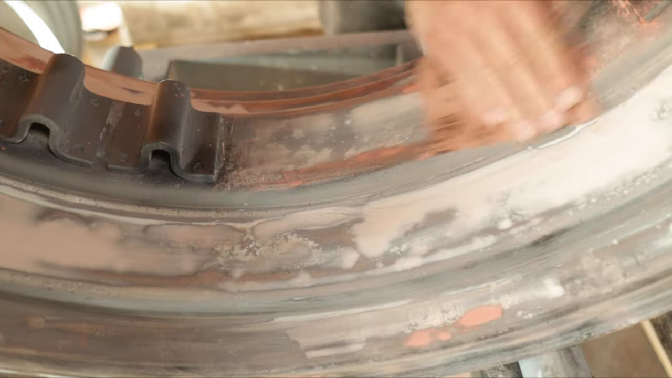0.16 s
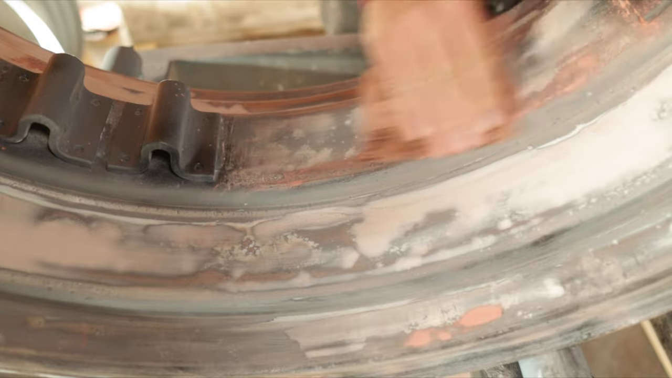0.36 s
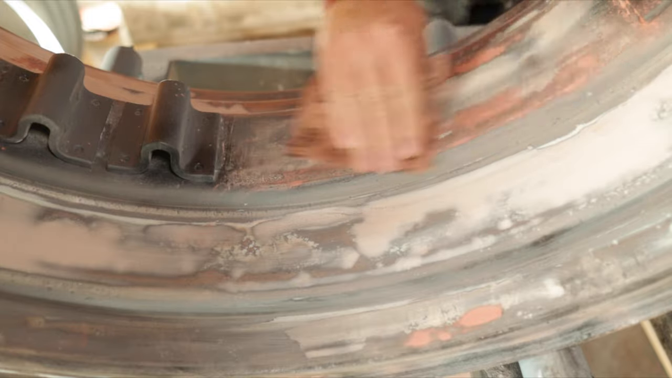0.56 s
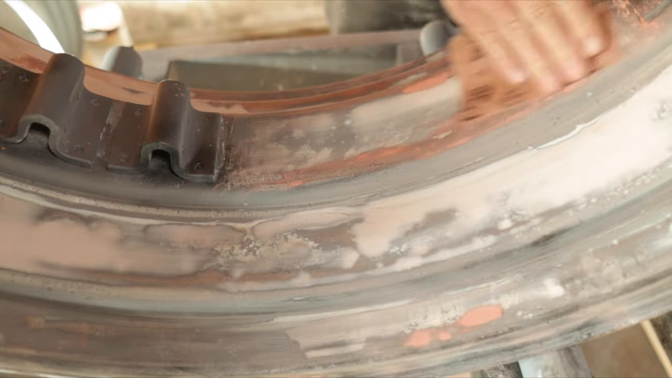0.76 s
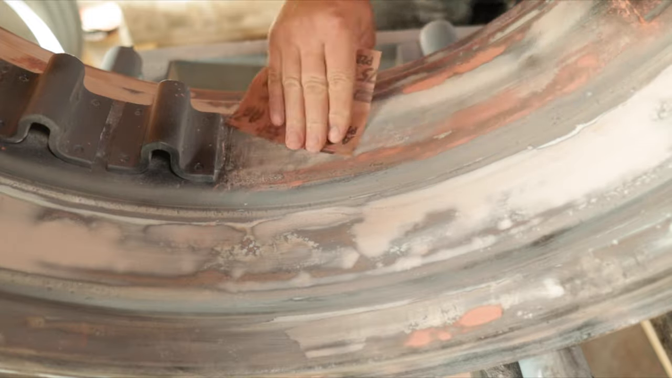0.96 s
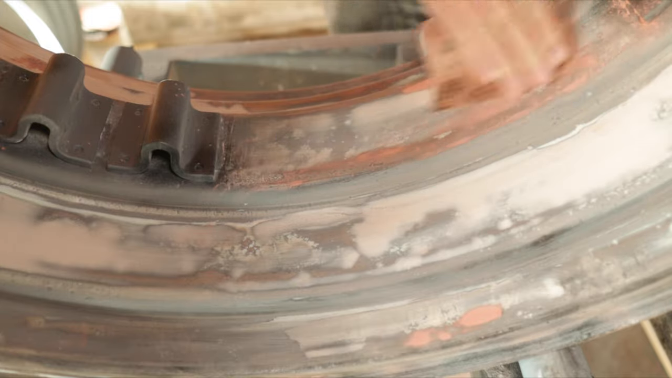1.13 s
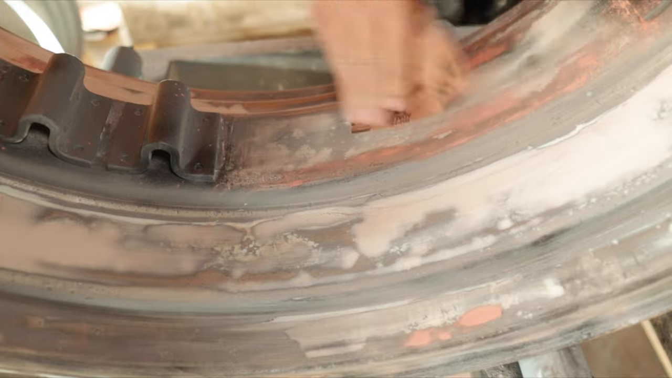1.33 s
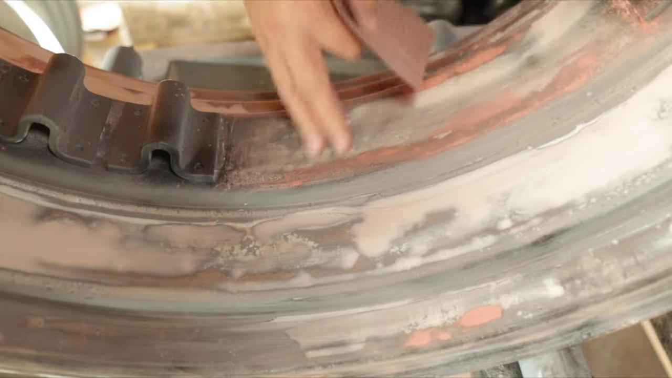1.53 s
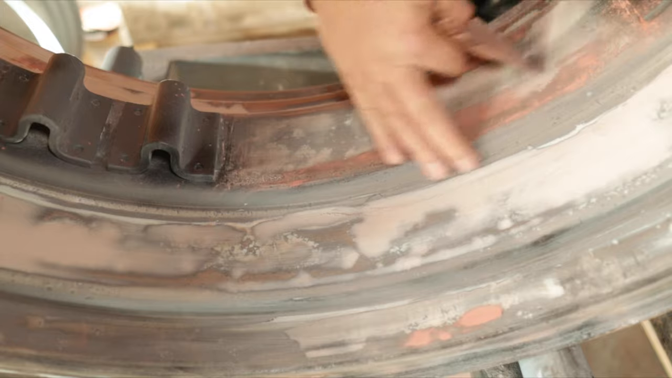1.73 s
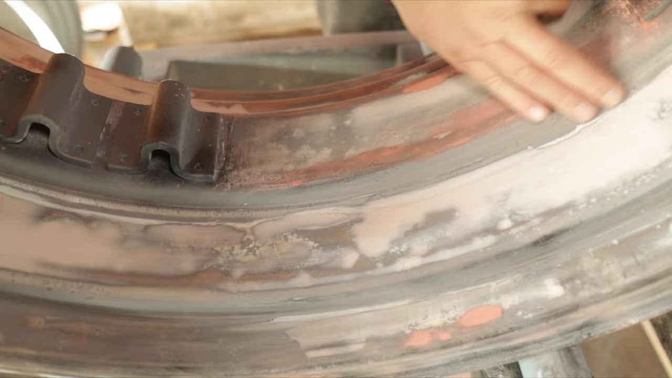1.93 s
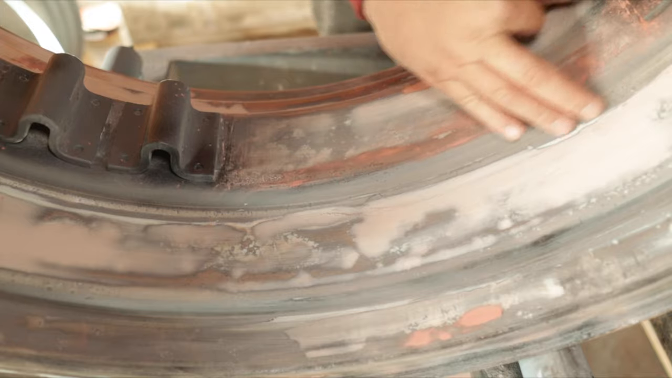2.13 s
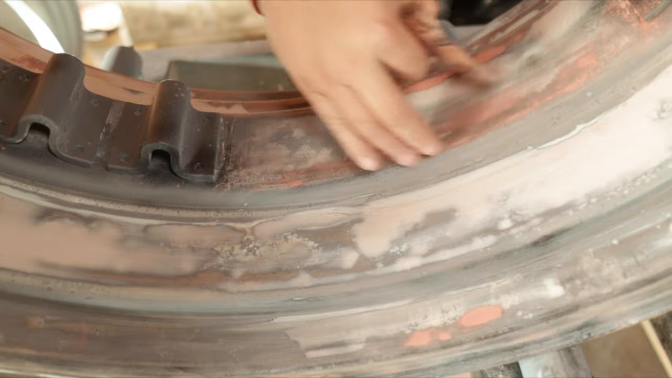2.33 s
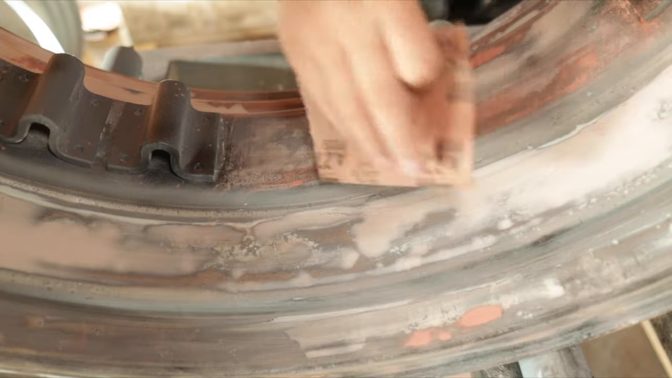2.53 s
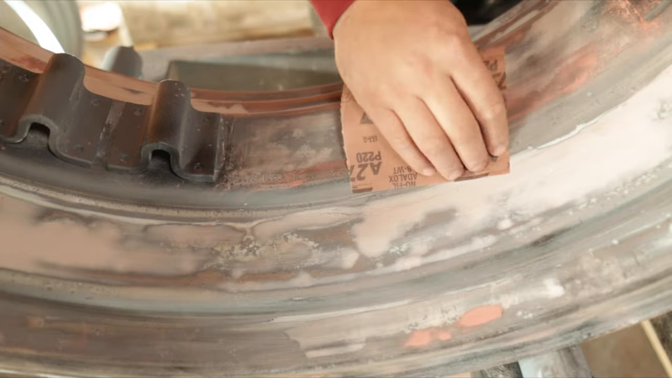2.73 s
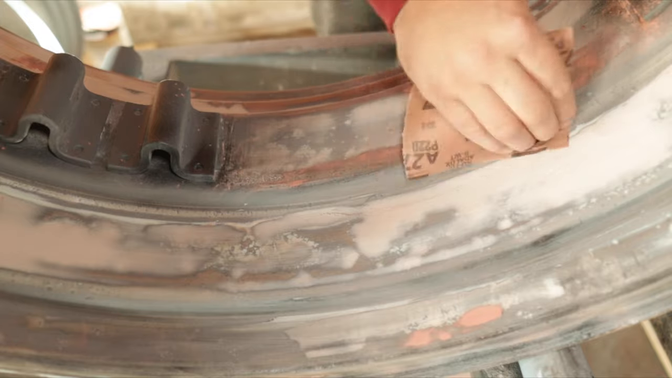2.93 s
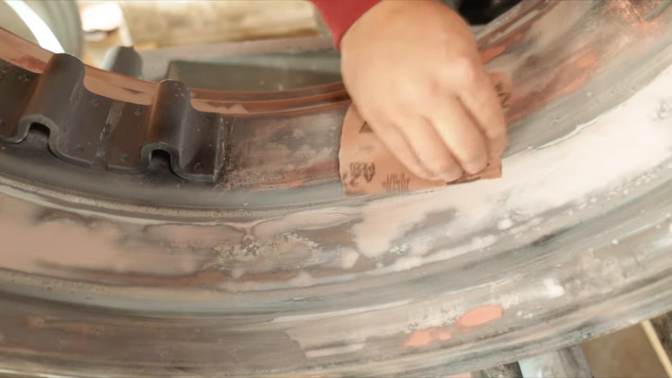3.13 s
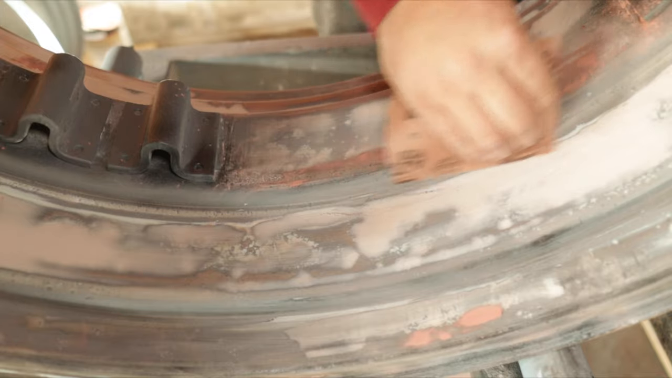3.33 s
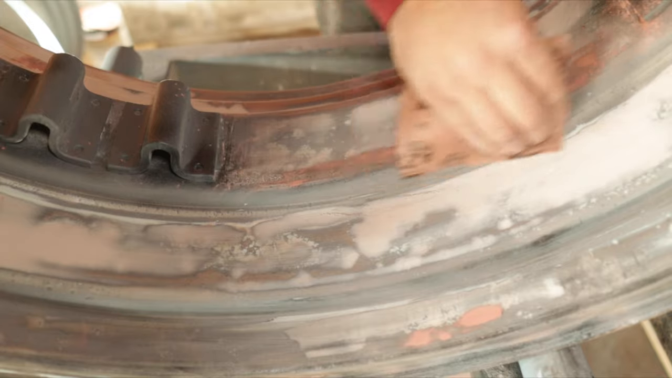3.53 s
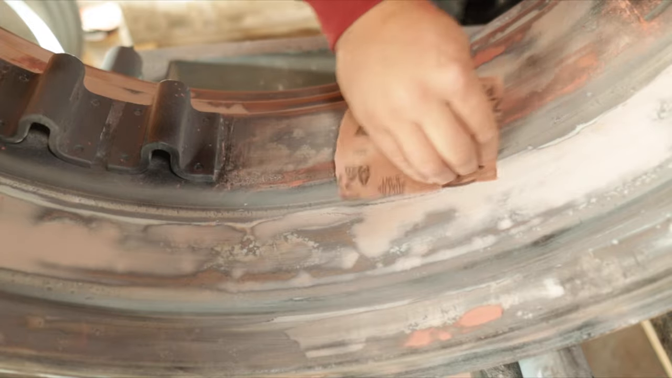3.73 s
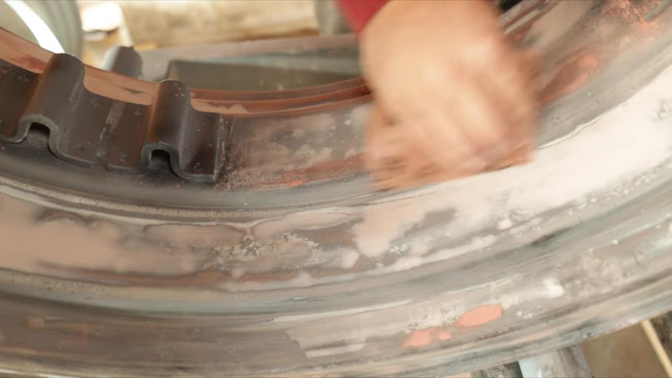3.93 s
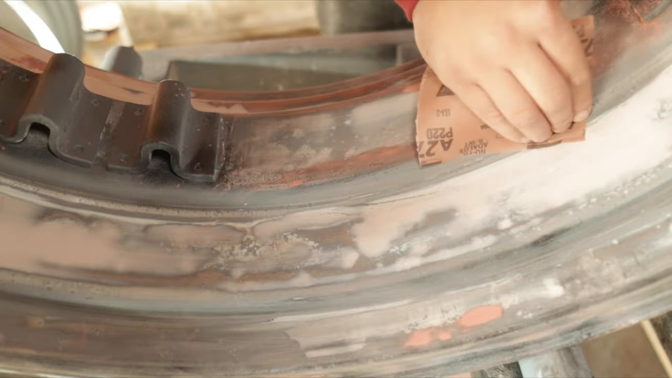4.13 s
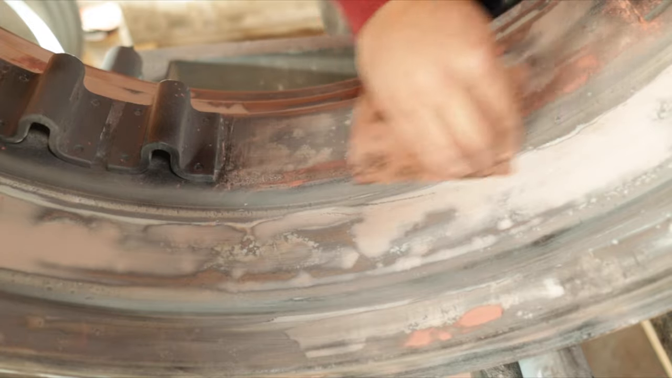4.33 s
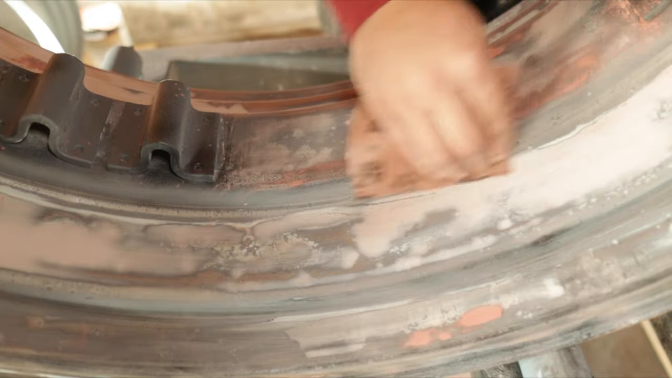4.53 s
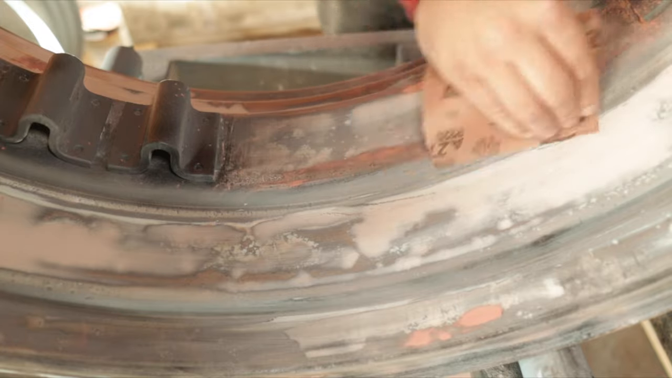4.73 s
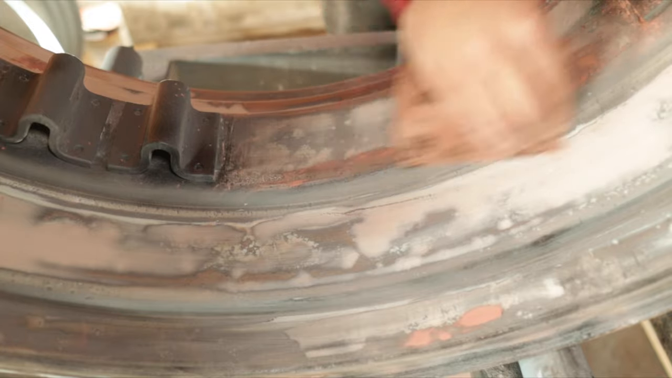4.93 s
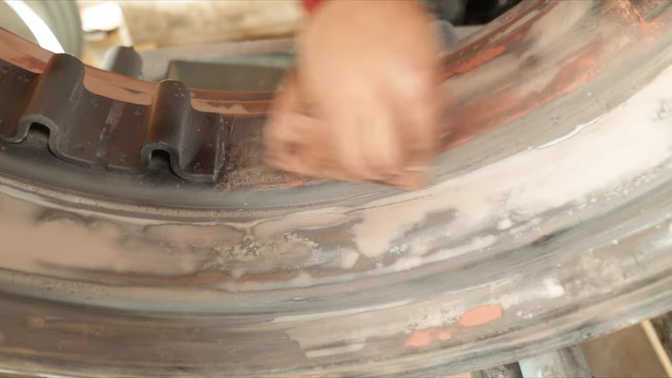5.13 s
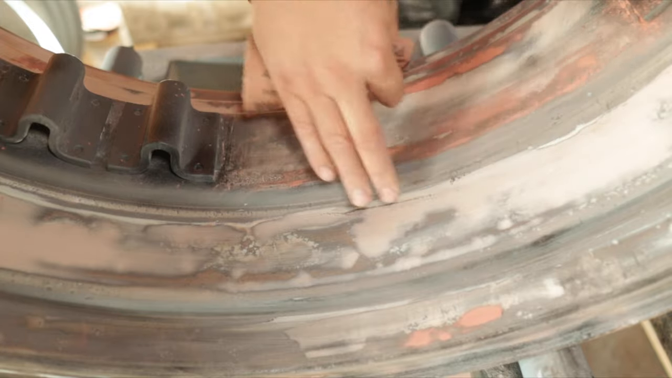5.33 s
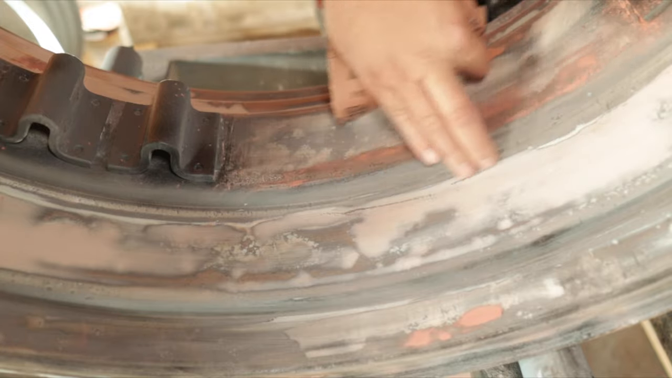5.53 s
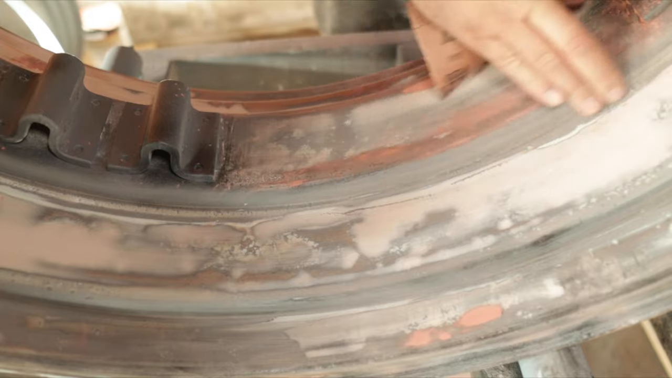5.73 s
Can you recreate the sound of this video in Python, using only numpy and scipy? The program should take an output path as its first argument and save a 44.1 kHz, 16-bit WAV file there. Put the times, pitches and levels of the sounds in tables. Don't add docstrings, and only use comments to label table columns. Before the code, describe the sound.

Sandpaper rasps in quick back-and-forth strokes on a primed metal rim, pauses for finger wipes, knocks and rustling paper, then scrubs faster and harder.

```python
import sys
import numpy as np
from scipy import signal
from scipy.fft import rfft, irfft, next_fast_len
from scipy.io import wavfile
from scipy.ndimage import uniform_filter1d, map_coordinates

SR = 44100
rng = np.random.default_rng(int(sys.argv[2]) if len(sys.argv) > 2 else 0)


def wrap_up_sound(samples):
    columns = np.atleast_2d(samples).T
    tamed = np.clip(columns, -1, 1)
    steps = np.round(tamed * 32767).astype(np.int16)
    wavfile.write(sys.argv[1], SR, steps)


def voltage_ratio(level):
    return 10 ** (np.asarray(level, float) / 20)


N = 258867

# start in seconds, end in seconds, grit hiss in dB,
# pressure as rim level in dB over the hiss, dig-in along the stroke in dB.
STROKES = [(-0.15, 0.041, -22.5, -8.5, 9), (0.089, 0.343, -18.5, -15.5, 3), (0.39, 0.593, -18, -17.5, 4.5),
           (0.637, 0.843, -19, -19.5, -1.5), (0.859, 1.078, -21.5, -19, 0.5), (1.104, 1.295, -25.5, -12, 5),
           (1.314, 1.422, -23, -12.5, 10), (2.94, 3.051, -20, 2.5, 0), (3.101, 3.221, -18, 0.5, 6),
           (3.267, 3.371, -19, -1, 2), (3.406, 3.535, -19.5, 0.5, 1), (3.575, 3.682, -20.5, 0.5, 3.5),
           (3.715, 3.825, -18, 0.5, 7), (3.866, 3.964, -22, 0, 4), (3.993, 4.111, -20.5, 0.5, 9.5),
           (4.146, 4.256, -21, -1.4, -3), (4.281, 4.397, -21, 0.5, 13.5), (4.429, 4.537, -20.5, -1.5, 4.5),
           (4.566, 4.68, -20.5, -2, 10.5), (4.716, 4.816, -20.5, -3, 0), (4.845, 4.961, -19.5, -2, 10.5),
           (4.995, 5.102, -22, -1, 4), (5.131, 5.271, -23, -6.5, -7)]

# frequency in Hz, level in dB.
HISS = [(900, -16.5), (1750, -2), (2500, -1), (3700, 1), (4800, 2), (7000, -4.5), (9500, -15.5),
        (15800, -57)]
SIZZLE = [(4000, -33), (6400, -4.5), (8000, -2.5), (9600, -0.5), (12000, -2), (14500, -7), (16500, -6.5)]

# frequency in Hz, width in Hz, level in dB.
SHEET = [(1650, 280, -11), (2173, 234, 0), (2393, 300, 1.5), (2650, 320, 0.5), (3000, 360, -7.5)]
RIM = [(335.6, 113, -11.5), (467, 106, -8), (650, 134, -5.5), (800, 120, -2.5), (936, 115, -1.5),
       (1050, 85, 0.5), (1147, 117, -1.5), (1325, 150, -3.5), (1462, 164, -5.5), (1740, 540, -13),
       (3550, 380, -9)]
RIM_EDGE = [(4700, 350, -2), (5600, 300, -5), (6250, 250, 0), (6800, 400, 0), (7600, 500, -2),
            (8800, 600, 0), (9700, 500, 0), (11200, 700, -2)]

# frequency in Hz, width in Hz, level in dB.
FINGERTIP = [(1540, 250, 3), (1980, 200, 12.5), (2370, 210, 13.5), (2900, 700, 5.5), (3650, 290, 6.5),
             (5080, 340, -7.5)]
PALM = [(362, 96, 5), (490, 27, 9.5), (670, 280, 3), (1018, 45, 7), (1200, 240, 1.5)]
SLIDE_HOLLOW = [(1364, 330, -2), (1770, 370, 0.78)]

# time in seconds, centre of the ring in Hz.
SLOW_BEND = [(0.0, 2430), (0.476, 2805), (0.64, 2340), (0.704, 2650), (0.994, 2568), (1.142, 2289),
             (1.182, 2576), (1.298, 2310), (1.43, 3094)]
QUICK_BEND = [(2.94, 2546), (3.04, 2635), (3.23, 2322), (3.28, 2546), (3.89, 2450), (4.0, 2666),
              (4.07, 2489), (5.24, 2520), (5.27, 2594)]

# time in seconds, peak in dB, rise in seconds, fall in seconds (each over 20 dB; a fall below 0 is abrupt).
RUSTLES = [(1.425, -22, .03, 0.16), (1.44, -18, 0.052, 0.01), (1.475, -17, 0.03, 0.0653),
           (1.712, -37, 0.026, 0.2), (1.77, -44, 0.16, -5), (1.795, -33, 0.014, -0.1),
           (1.84, -30, 0.11, 0.08), (1.9, -34, .2, -0.3), (1.96, -36, .04, 0.5), (2.013, -25, 0.012, 0.08),
           (2.034, -31, .03, -0.04), (2.072, -34, 0.023, 0), (2.088, -27.5, .04, -0.06),
           (2.15, -35, .012, 0.16), (2.2, -45, 0.087, -2), (2.245, -39.5, 0.15, 0.25), (2.32, -44, .3, 1),
           (2.52, -34, 0.06, 0.16), (2.708, -29, 0.009, 0.16), (2.745, -23.5, 0.06, -0.4),
           (2.775, -26.5, .06, -0.36), (2.95, -38, 0.12, 4), (5.28, -26.5, 0.012, 0.13)]
BRUSHES = [(1.466, -24, 0.16, 0.065), (1.67, -45.5, 0.29, 0.032), (1.717, -35, 0.11, 0.016),
           (1.78, -41, 0.19, 0.067), (1.86, -35.5, 0.4, 0.27), (2.004, -26, 0.037, 0.011),
           (2.07, -33, 0.09, 0.077), (2.17, -41, .15, 0.29), (2.526, -30.5, 0.073, 0.066),
           (2.616, -44, .016, .16), (2.7, -31, 0.0055, .008), (2.734, -16.5, 0.012, 0.024),
           (2.143, -35, .004, 0.092), (2.762, -28, .04, 0.069), (2.88, -44, 0.18, 0.14),
           (2.916, -30.5, 0.0084, 0.18), (5.62, -51, 0.32, 0.1), (5.82, -54, 0.22, .5),
           (5.28, -40, 0.013, 0.065), (5.42, -62, 0.18, 0.96)]
DRAGS = [(1.43, -30, 0.018, 0.17), (1.475, -21.5, 0.022, .05), (1.575, -40, .2, .08),
         (1.717, -46, .11, 0.18), (1.785, -28, .01, 0.008), (1.87, -37, 0.44, 0.32),
         (2.072, -26.5, 0.037, 0.063), (2.143, -39, .004, 0.25), (2.65, -45.5, 0.8, .4),
         (2.75, -26.5, 0.039, 0.25), (2.83, -28, .2, 0.059), (2.916, -24, 0.0092, 0.19),
         (5.43, -43, 0.88, 0.24)]

# time in seconds,
# peak in dB, rise in seconds, fall in seconds.
WHISPERS = [
    (2.4, -49, 0.28, 0.073),
    (5.8, -55.5, 0.26, .6),
]
SLIDES = [
    (5.39, -45, 0.33, 0.085),
]

# time in seconds, peak in dB, rise in seconds, fall in seconds.
LEANS = [(.55, -62, 0.56, .3), (1.27, -52, 0.14, .1), (1.7, -56, .06, .3), (1.83, -34.5, 0.19, 0.14),
         (1.94, -40, .1, 0.089), (2.12, -39, 0.23, 0.17), (2.46, -41.5, 0.31, 0.076),
         (2.71, -41, 0.18, 0.13), (3.0, -50, .2, 0.29), (3.64, -55, 0.096, 0.28), (4.04, -54, 0.048, 0.27),
         (5.2, -56, 0.28, 0.75)]
SHOVES = [(.06, -48.5, 0.34, .8), (1.18, -41, 0.32, 0.35), (1.47, -39, 0.077, 0.2), (1.7, -35, 0.04, 0.17),
          (1.85, -54, 0.18, 0.16), (1.96, -35, 0.27, 0.2), (2.08, -44, .1, 0.34), (2.53, -48, 0.16, 0.055),
          (2.73, -31, 0.059, 0.12), (2.95, -34, 0.43, 0.37), (3.5, -43.5, 0.75, 0.5),
          (4.32, -42, 0.52, 0.57), (5.02, -44, .1, 0.034), (5.25, -42, 0.48, 0.73)]

# frequency in Hz, level in dB.
RUMBLE = [(60, -9), (110, 3.5), (160, 4.5), (220, 6.5), (300, -3.5), (450, -29.5)]
ROOM_TONE = [(15, -28), (25, -16.5), (116, 0), (194, -27), (234, -22), (275, -3.5), (1060, -10), (1280, -4),
             (1550, -7.5), (3560, -14.5), (9930, -8.5), (15700, -14)]

# frequency in Hz, time to fade by 60 dB in seconds.
SHOP_T60 = [(200, 0.63), (1500, 0.79), (5000, 0.53), (14000, 0.33)]

# time in seconds, peak in dB, hollow under the hand in Hz.
THUDS = [(1.496, -13, 730), (1.507, -21, 340), (1.689, -20, 630), (1.942, -4, 383), (1.993, -4.5, 902),
         (2.007, -7, 543), (2.066, -25, 935), (2.083, -13.5, 670), (2.141, -18, 900), (2.472, -14.5, 754),
         (2.583, -25.5, 380), (2.641, -11, 495), (2.725, -2, 1010), (2.742, -15, 526), (2.788, -28, 1110)]
RAPS = [(1.421, -20, 382), (1.439, -3.5, 440), (1.451, -1.5, 454), (1.47, -18, 735), (1.549, -21, 490),
        (1.702, -17, 650), (1.709, -19, 660), (1.92, 4, 670), (1.939, -13, 460), (2.024, -24, 760),
        (2.101, -12.5, 630), (2.701, -21, 856), (2.707, -21, 404), (2.721, 1.5, 620), (2.733, 4, 516),
        (2.753, -11, 557), (2.775, -10, 875)]
CATCHES = [
    (2.914, -14, 970),
    (3.1, -11, 1110),
    (3.133, 0, 770),
    (3.715, -12, 1081),
    (4.571, -11, 1310),
    (4.847, -6.5, 1136),
    (5.141, -6.5, 970),
]

# time in
# seconds, peak in dB, hollow under the hand in Hz, sheet edge in dB over the peak, paper snap in dB over the
FURTHER_BLOWS = [(1.477, -5, 360, 1.5, -21), (1.792, -28.5, 362, 14.5, -17), (1.9834, -4, 670, -18, -30.5),
                 (2.1761, -4.5, 1600, -35, -27), (2.1790, -27, 800, 3, -20), (2.638, -16, 900, -5, -25.5),
                 (4.001, -9, 780, 11, -16), (4.003, -15, 990, 8, -14), (2.472, -42, 1100, 1.5, -32),
                 (5.661, -46, 1430, 14, -30), (5.667, -46, 1430, 13, -30)]

# frequency in Hz, level in dB, time to fade by 60 dB in seconds.
HEEL_MODES = [(162, -27, 0.46), (356, -32.5, 0.24), (675, -28, 0.38)]

# time
# in seconds, peak in dB, time to fade by 60 dB in seconds.
TICKS = [(1.703, -33, .012), (1.7916, -20, .03), (1.8274, -30, .02), (1.922, -23, .015),
         (1.9407, -15.5, .035), (2.009, -19, .04), (2.0674, -28, .02), (2.102, -29, .02),
         (2.1458, -29, .02), (2.1766, -19, .025), (2.4907, -34, .015), (2.5082, -32, .015),
         (2.6384, -35, .015), (2.705, -27, 0.02), (2.7223, -7, 0.014), (2.733, -15, .025),
         (2.753, -18, .02), (2.7741, -26, .015),
         (2.5674, -34, .012),
    (2.794, -34.5, .015),
    (2.833, -29, .025),
    (2.8744, -29, 0.011),
]

SHEET_DB, SHEET_PER_PRESSURE = -0.9, 0.35
BRIGHT_DB, BRIGHT_PER_PRESSURE = 4, -0.18
SPEEDUP_DB, SPEEDUP_PER_DIG = 3.5, 0.24
RIM_DIG_DB, SHEET_DIG_DB = -7, -1.8
PUSH_RISE, PULL_RISE = 0.048, 0.073
RISE_DB_PER_PRESSURE = -0.02
PUSH_FALL, PULL_FALL = 0.062, 0.095
PUSH_BITE_DB, BITE_SHARE = 3.5, 0.078
PULL_ARCH_DB = 0
CREEP_DB, CREEP_S = -15.5, 0.04
SHEET_REST_HZ, SHEET_WANDER, RIM_WANDER = 2500, 0.015, 0.03
HUM_HZ, HUM_REST_DB, RUMBLE_REST_DB = 71.3, -61, -61.5
ROOM_TONE_DB = -44.5
THUD_EDGE_DB, RAP_EDGE_DB, CATCH_EDGE_DB = -49, -4.5, -7
THUD_SNAP_DB, RAP_SNAP_DB, CATCH_SNAP_DB = -32, -31, -21
HEEL_S, TICK_LOW_HZ = 1.688, 2180


def rms_one(x):
    return x / np.sqrt(np.mean(x ** 2) + 1e-20)


def at_hz(points, hz):
    points = np.array(points)
    return np.interp(np.log(hz + 1), np.log(points[:, 0]), points[:, 1])


def colour(x, spectrum):
    size = next_fast_len(N)
    gain = voltage_ratio(at_hz(spectrum, np.fft.rfftfreq(size, 1 / SR)))
    return rms_one(irfft(rfft(x, size) * gain, size)[:N])


def drift(rate):
    r = np.exp(-80 * np.pi * rate / SR)
    slow = signal.lfilter([1], [1, -2 * r, r * r], rng.standard_normal(N // 40 + 2002))[2000:]
    return np.interp(np.arange(N) / 40, np.arange(len(slow)), rms_one(slow))


def resonance(x, hz, width_hz):
    r = np.exp(-np.pi * width_hz / SR)
    return signal.lfilter(np.array([1, 0, -1]) * (1 - r * r) / 2, [1, -2 * r * np.cos(2 * np.pi * hz / SR), r * r], x)


def bank(x, modes, patchy_db):
    total = np.zeros(N)
    for k, (hz, width, db) in enumerate(modes):
        total += (-1) ** k * resonance(x * voltage_ratio(db + patchy_db * drift(6.5)), hz, width)
    return total


def driven(gain, grains, modes, patchy_db, pitch=1):
    rung = rms_one(bank(grains, modes, patchy_db))
    return gain * map_coordinates(rung, [np.cumsum(pitch + np.zeros(N))], order=3, mode="grid-wrap")


def touches(rows):
    t = np.arange(0, N, 16) / SR
    db = []
    for s, peak_db, rise, fall in rows:
        away = np.maximum((s - t) / max(rise, .002), (t - s) / max(fall, .002))
        db.append(peak_db - 20 * away)
    return np.interp(np.arange(N) / SR, t, voltage_ratio(np.max(db, axis=0)))


def grit(per_s, spread_db):
    sizes = voltage_ratio(spread_db * np.minimum(rng.exponential(1, N), 5)) * rng.choice([-1, 1], N)
    return rms_one(sizes * (rng.random(N) < per_s / SR) + 1e-9)


def creases(per_s, t60):
    bursts = signal.lfilter([1], [1, -voltage_ratio(-60 / (t60 * SR))], np.abs(grit(per_s, spread_db=8.5)))
    return bursts / bursts.mean()


def bends():
    s, hz = np.transpose(SLOW_BEND + QUICK_BEND)
    bent = (np.interp(np.arange(N) / SR, s, hz) / SHEET_REST_HZ) ** .7
    return bent + SHEET_WANDER * drift(9), 1 + RIM_WANDER * drift(7)


def stroke_gain(levels_db, swells_db, arch_db, slow, bite):
    t, out = np.arange(N) / SR, np.zeros(N)
    for k, ((start, end, _, pressure_db, _), level_db, swell_db) in enumerate(zip(STROKES, levels_db, swells_db)):
        pull, length = k % 2, end - start
        rise = (PULL_RISE if pull else PUSH_RISE) * length * voltage_ratio(RISE_DB_PER_PRESSURE * pressure_db)
        fall = (PULL_FALL if pull else PUSH_FALL) * length
        near = slice(max(0, int((start - .15) * SR)), int((end + .15) * SR))
        along = np.clip((t[near] - start) / length, 0, 1)
        loose = 1 / (1 + np.exp((start - t[near]) / (slow * max(rise, .002))))
        moving = 1 / (1 + np.exp((t[near] - end) / (slow * max(fall, .002))))
        hump = np.sin(np.pi * along) - 1
        arch = arch_db * length / 0.29 * hump
        if pull:
            arch += PULL_ARCH_DB * hump
        else:
            arch += bite * PUSH_BITE_DB * np.exp((along - 1) / BITE_SHARE)
        out[near] += loose * moving * voltage_ratio(level_db + swell_db * (along - .5) + arch)
    return out


def rubbing():
    _, _, hiss_db, rim_db, dig_db = np.transpose(STROKES)
    sheet_db = SHEET_DB + SHEET_PER_PRESSURE * rim_db
    bright_db = BRIGHT_DB + BRIGHT_PER_PRESSURE * rim_db
    swell_db = SPEEDUP_DB + SPEEDUP_PER_DIG * dig_db
    rim_swell_db, sheet_swell_db = RIM_DIG_DB + dig_db, SHEET_DIG_DB + dig_db
    fine, coarse = grit(16000, spread_db=2.0), grit(3200, spread_db=3.0)
    sheet_pitch, rim_pitch = bends()
    judder = voltage_ratio(0.85 * drift(70))
    crackle = voltage_ratio(-6.5) * touches(RUSTLES) * (1.1 + 0.12 * creases(400, t60=0.02))

    hiss = judder * stroke_gain(hiss_db - 5.5, 0.7 * swell_db, arch_db=-1.0, slow=0.57, bite=0.17)
    sizzle = judder * stroke_gain(hiss_db - 5.5 + bright_db, 1.5 * swell_db, arch_db=12.5, slow=0.51, bite=0.077)
    sheet = judder * stroke_gain(hiss_db + sheet_db + 0.38, 1.07 * sheet_swell_db, arch_db=-0.5, slow=0.41, bite=1.27)
    rim = judder * stroke_gain(hiss_db + rim_db + 0.079, 0.49 * rim_swell_db, arch_db=-10.0, slow=0.94, bite=0.9)
    hiss, sizzle = (g + voltage_ratio(CREEP_DB) * uniform_filter1d(g, size=int(CREEP_S * SR)) for g in (hiss, sizzle))

    air = (hiss * voltage_ratio(2.14 * drift(5.3)) + voltage_ratio(-4.0) * crackle) * colour(fine, HISS)
    treble = sizzle * voltage_ratio(1.57 * drift(11.8)) + voltage_ratio(-1.9) * crackle + touches(WHISPERS)
    air += treble * colour(fine, SIZZLE)
    air += driven(voltage_ratio(-12) * hiss, np.roll(fine, 4000), RIM_EDGE, patchy_db=5)
    steel = driven(sheet, coarse, SHEET, 1.7, sheet_pitch) + driven(rim, coarse, RIM, 2.0, rim_pitch)
    hand = driven(judder * touches(BRUSHES), coarse, FINGERTIP, .6)
    hand += driven(judder * touches(DRAGS), coarse, PALM, 1.5)
    return air + steel + hand + driven(touches(SLIDES), coarse, SLIDE_HOLLOW, 0.92)


def rocking():
    hum = touches(LEANS) + voltage_ratio(HUM_REST_DB)
    rumble = touches(SHOVES) + voltage_ratio(RUMBLE_REST_DB)
    tone = np.sqrt(2) * np.sin(2 * np.pi * np.cumsum(HUM_HZ + 1.2 * drift(3.8)) / SR)
    return voltage_ratio(-4.5) * hum * tone + voltage_ratio(-4.0) * rumble * colour(rng.standard_normal(N), RUMBLE)


def workshop(x):
    size = next_fast_len(N + SR)
    hz = np.fft.rfftfreq(size, 1 / SR)
    t60 = at_hz(SHOP_T60, hz)
    echoes = np.zeros(len(hz), complex)
    for k, lag in enumerate(rng.uniform(.012, .05, 10)):
        loop = voltage_ratio(-60 * lag / t60) * np.exp(-2j * np.pi * hz * lag)
        echoes += (-1) ** k * loop / (1 - loop)
    return irfft(rfft(x, size) * echoes, size)[:N]


def gain_control(x, knee_db=-42, most_db=17, memory_s=0.054):
    keep = np.exp(-1 / (memory_s * SR))
    power = signal.lfilter([1 - keep], [1, -keep], uniform_filter1d(x ** 2, size=1500))
    level_db = 10 * np.log10(power + 1e-12)
    return -np.clip(2.5 * (level_db - knee_db), 0, most_db)


def room_tone(work):
    return voltage_ratio(ROOM_TONE_DB + gain_control(work)) * colour(rng.standard_normal(N), ROOM_TONE)


def knocks():
    out, span = np.zeros(N + 4000), np.arange(4000) / SR
    blows = [row + (THUD_EDGE_DB, THUD_SNAP_DB) for row in THUDS]
    blows += [row + (RAP_EDGE_DB, RAP_SNAP_DB) for row in RAPS]
    blows += [row + (CATCH_EDGE_DB, CATCH_SNAP_DB) for row in CATCHES]
    blows += FURTHER_BLOWS
    for (s, peak_db, hz, edge_db, snap_db), noise in zip(blows, rng.standard_normal((len(blows), 4000))):
        blow = signal.unit_impulse(4000) + 0.063 * noise * voltage_ratio(-60 * span / 0.033)
        lag = np.exp(-2 * np.pi * 3.7 * hz / SR)
        soft = signal.lfilter([1], [1, -2 * lag, lag * lag], blow)
        hollow = resonance(soft, hz, .4 * hz)
        rim = sum(resonance(soft, f, 0.45 * w) * voltage_ratio(db + 2.5 * luck) for (f, w, db), luck in zip(RIM, noise[-20:]))
        edge = sum(resonance(blow, f, 0.41 * w) * voltage_ratio(db + 2.4 * luck) for (f, w, db), luck in zip(SHEET, noise[-9:]))
        snap = np.diff(noise, prepend=0) * voltage_ratio(-60 * span / 0.018)
        for part, level_db in ((hollow, -5.5), (rim, -7.5), (edge, edge_db), (snap, snap_db)):
            out[round((s + .0014) * SR):][:4000] += part / np.abs(part).max() * voltage_ratio(peak_db + level_db)
    return out[:N]


def heel():
    t = np.maximum(np.arange(N) / SR - HEEL_S, 0)
    return sum(voltage_ratio(db - 60 * t / t60) * np.sin(2 * np.pi * hz * t) for hz, db, t60 in HEEL_MODES)


def ticks():
    out, span = np.zeros(N), np.arange(1500) / SR
    rows = TICKS
    for (s, db, t60), noise in zip(rows, rng.standard_normal((len(rows), 1500))):
        out[round(s * SR):][:1500] += voltage_ratio(db - 8.0 - 60 * span / t60) * noise
    return signal.sosfilt(signal.butter(2, TICK_LOW_HZ, "high", fs=SR, output="sos"), out)


def scene():
    no_bass = signal.butter(3, 230, "high", fs=SR, output="sos")
    work = signal.sosfilt(no_bass, rubbing() + knocks() + heel())
    work = work + voltage_ratio(-22.5) * workshop(work)
    return np.tile(work + rocking() + room_tone(work) + ticks(), (2, 1))


def low_pass(x):
    return signal.sosfilt(signal.butter(12, 16160, fs=SR, output="sos"), x)


def record(dry):
    rounded = 1.02 * np.tanh(dry / 1.02)
    mix = signal.sosfilt(signal.ellip(12, .5, 70, 15830, fs=SR, output="sos"), rounded)
    return low_pass(mix)


dry = scene()
out = record(dry)
wrap_up_sound(out)
```